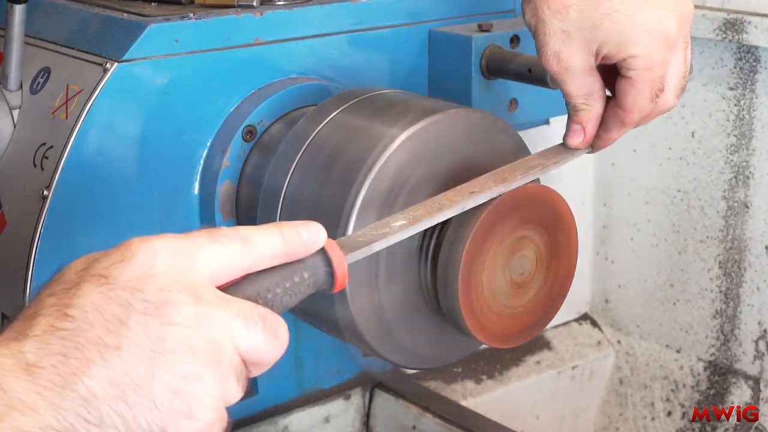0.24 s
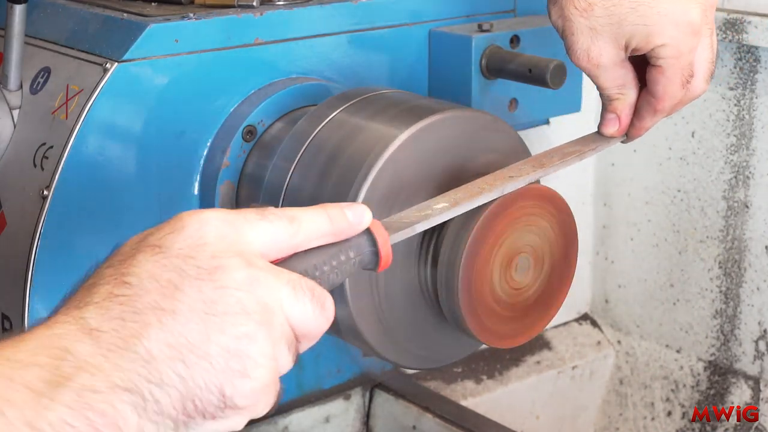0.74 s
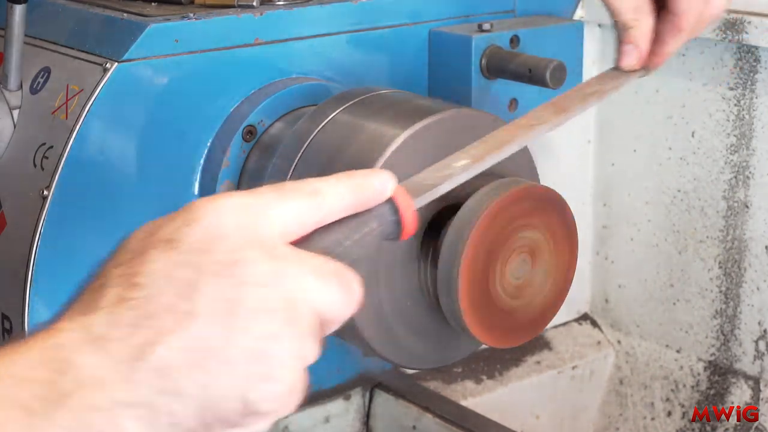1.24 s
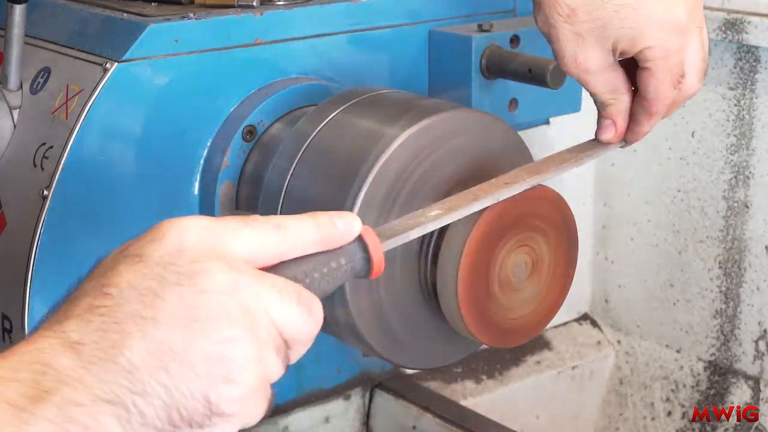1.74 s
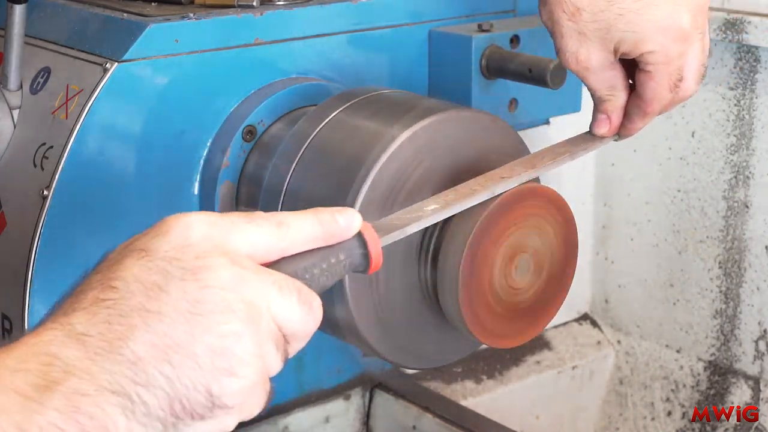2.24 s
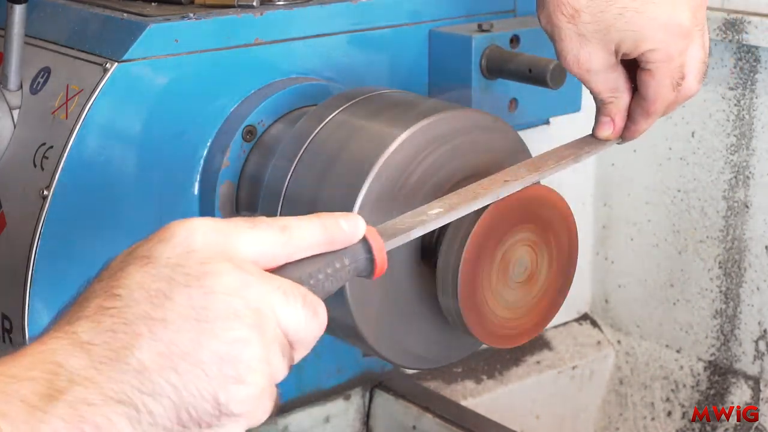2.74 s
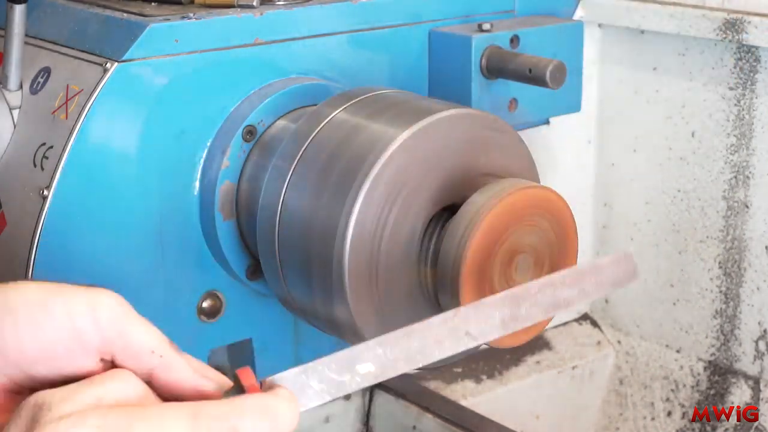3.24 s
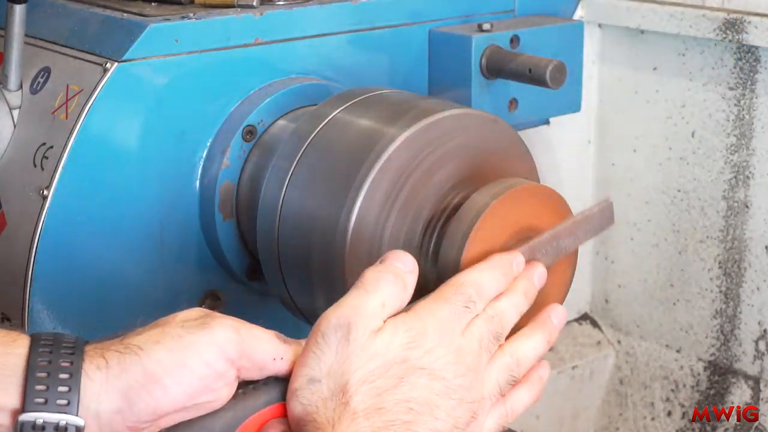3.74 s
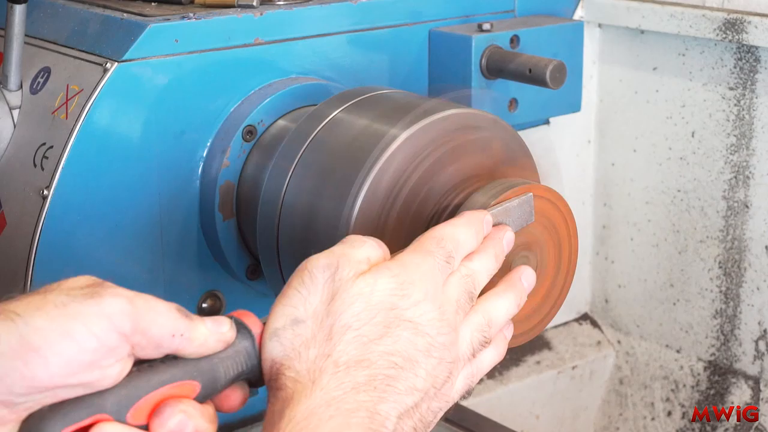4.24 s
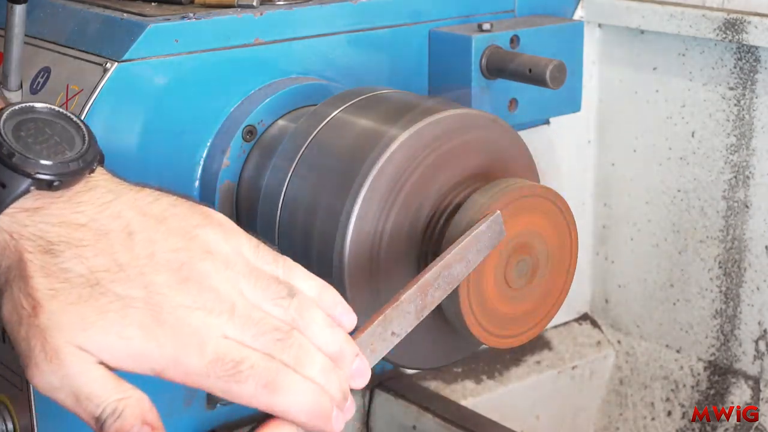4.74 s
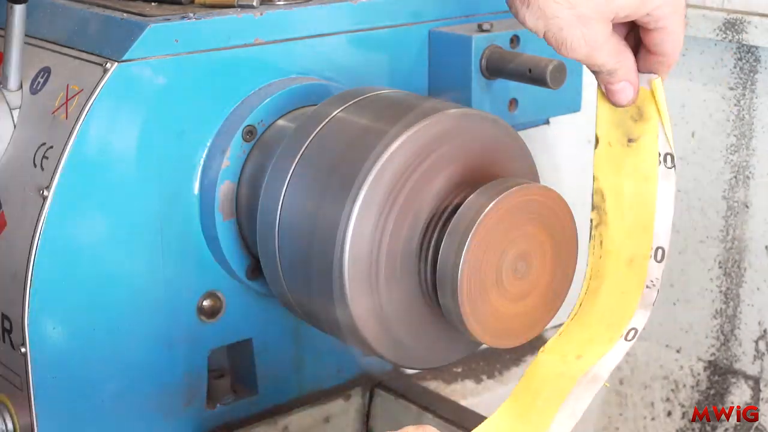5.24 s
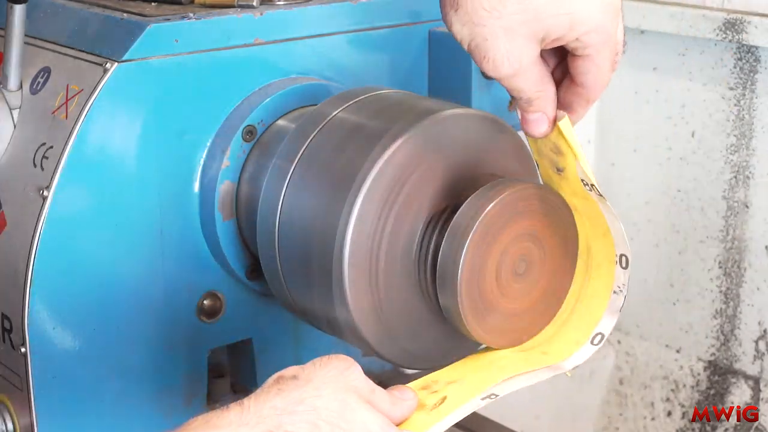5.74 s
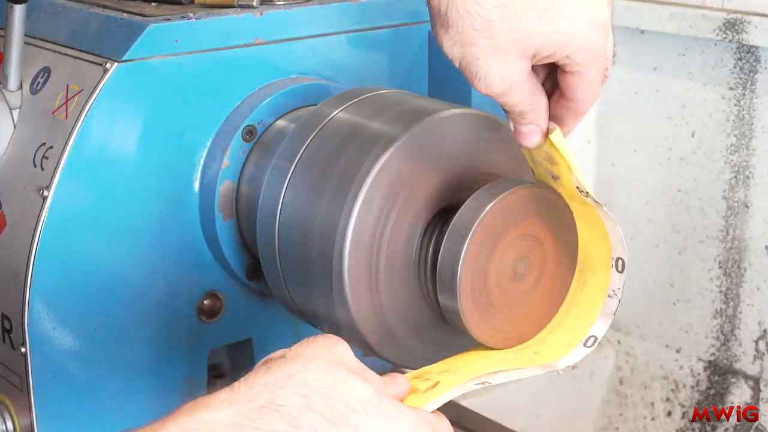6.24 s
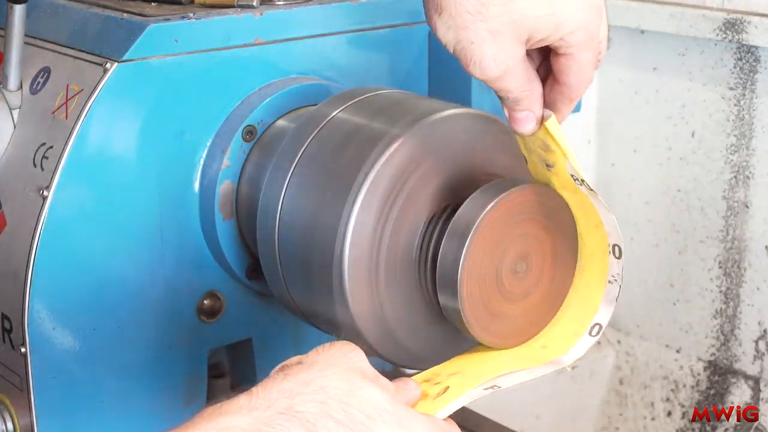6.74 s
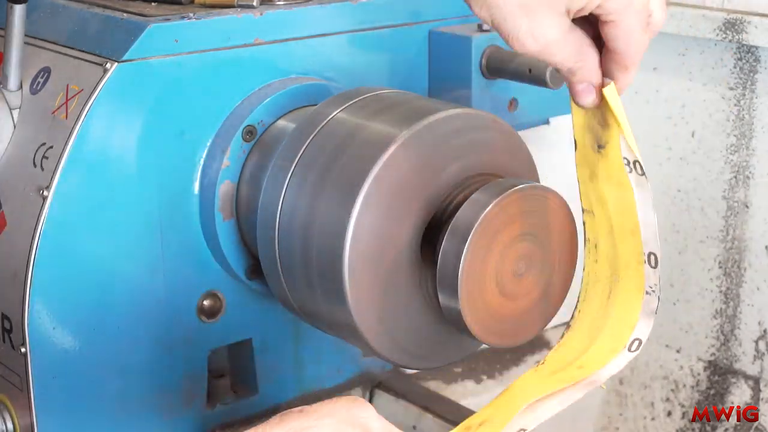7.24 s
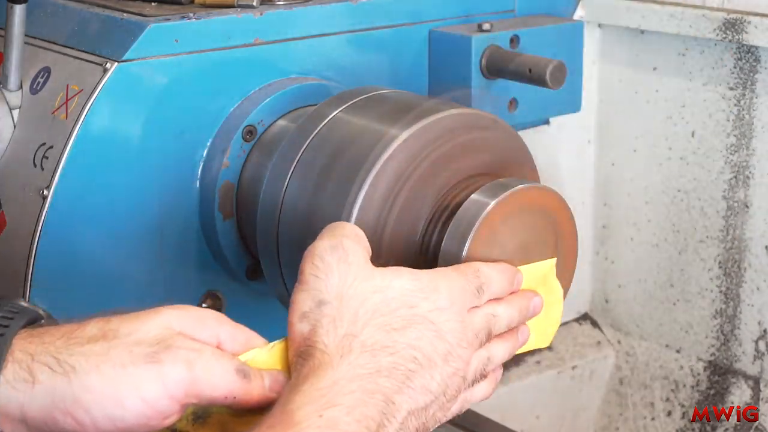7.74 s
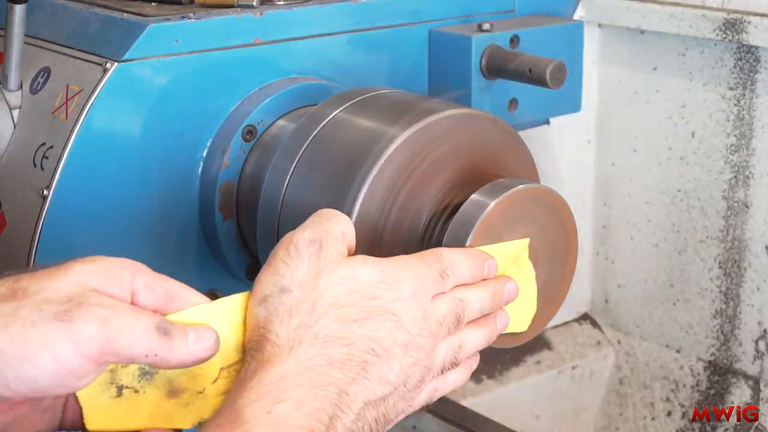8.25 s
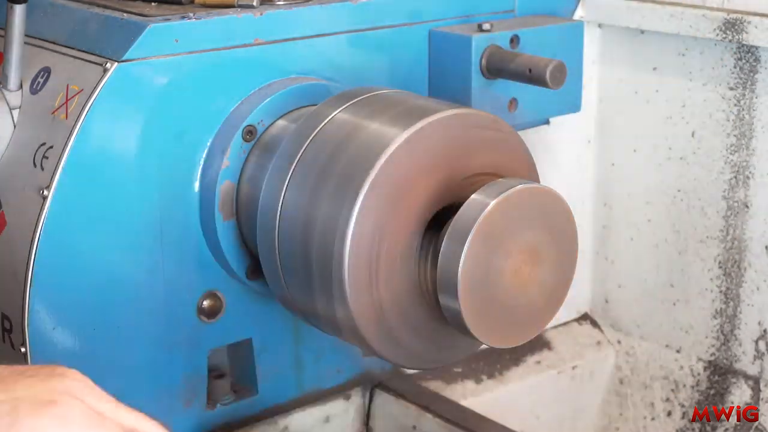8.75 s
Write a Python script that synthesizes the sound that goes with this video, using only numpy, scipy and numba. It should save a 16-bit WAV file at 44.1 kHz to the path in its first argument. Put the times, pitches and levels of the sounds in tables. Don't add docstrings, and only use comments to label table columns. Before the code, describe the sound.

A small lathe whirs with a gear whine as a file rasps metal, then everything jumps to a sped-up, high shrill whine with hiss.

```python
import sys
import numpy as np
from scipy import signal
from scipy.fft import rfft, irfft, next_fast_len
from scipy.io import wavfile
from scipy.ndimage import uniform_filter1d
from numba import njit

SR = 44100
rng = np.random.default_rng(int(sys.argv[2]) if len(sys.argv) > 2 else 0)


def to_linear_factor(level_db):
    exponent = np.asarray(level_db, float) / 20
    return 10 ** exponent


def generate_wav(sig):
    pcm = np.round(np.clip(np.atleast_2d(sig).T, -1, 1) * 32767).astype(np.int16)
    wavfile.write(sys.argv[1], SR, pcm)


N = 396900

CUT_S, HASTE = 1.5075, 6
CLEAR_DB = -60


def on_log(hz, table):
    f, v = np.transpose(table)
    return np.interp(np.log(hz + 1), np.log(f), v)


def unit(x):
    return x / np.sqrt(np.mean(x ** 2))


def walk(n, rate):
    knots = rng.standard_normal(int(n * rate / SR) + 3)
    return 0.79 * np.interp(np.arange(n) * rate / SR, np.arange(len(knots)), knots)


def steps(t, rows, ease_s):
    s, *columns = np.transpose(rows)
    row = np.clip(np.searchsorted(s, t, "right") - 1, 0, None)
    held = np.array(columns)[:, row]
    return uniform_filter1d(held, int(ease_s * SR), axis=1, mode="nearest")


def gate_db(t, s, end, rise_s, fall_s, depth_db=25):
    return depth_db * np.clip(np.minimum((t - s) / rise_s, (end - t) / fall_s), -4, 0)


@njit
def sweep(x, hz, width):
    y, b, l = np.empty(len(x)), 0., 0.
    for i in range(len(x)):
        g, k = np.tan(np.pi * hz[i] / SR), width / hz[i]
        v = (b + g * (x[i] - l)) / (1 + g * (g + k))
        b, l, y[i] = 2 * v - b, l + 2 * g * v, k * v
    return y


def bumps():
    # start_s, peak_db, pitch_hz, t60_s
    bump_events = [(5.204, -73, 300, .04), (5.205, -72, 130, 0.036), (7.164, -83, 205, .25),
                   (7.272, -66, 200, 0.14), (7.274, -79, 335, .1), (7.31, -78, 240, .2),
                   (7.349, -86, 60, .05), (8.0, -91, 240, 2.5), (8.299, -91, 135, .2), (8.67, -87, 200, .2),
                   (8.815, -83, 200, .2), (8.949, -86, 210, .2)]
    out, t = np.zeros(N), np.arange(SR // 2) / SR
    for s, db, hz, t60 in bump_events:
        ring = np.sin(2 * np.pi * np.cumsum(hz * (1 + 0.12 * walk(len(t), 40.0))) / SR)
        onset = np.sin(np.pi / 2 * np.minimum(t / .007, 1)) ** 2
        thud = ring * to_linear_factor(db - 60 * t / t60) * onset
        i = int(s * SR)
        out[i:i + len(t)] += thud[:N - i]
    return out


def file_tip(t):
    tip_s, tip_end_s, ease_s, tip_db = 4.6, 5.02, .06, -61
    rings = sum(sweep(rng.standard_normal(len(t)), hz + 0 * t, 280.) for hz in (14650., 15250.))
    contact_db = gate_db(t, tip_s, tip_end_s, ease_s, ease_s)
    return unit(rings) * to_linear_factor(tip_db + contact_db + 2.3 * walk(len(t), 40.0))


def file_stroke(t, scatter_db=2.5, throb_db=4.5, alike=.5):
    # centre_hz, width_hz
    file_modes = [(10900, 12000), (9470, 1100), (10560, 600), (13750, 450)]
    # loudest_db, fall_to_node_db, loudest_place (0-1), node_spacing (0-1), growth_db
    node_rows = [(-66.5, 5, 0.5, 1.5, -2), (-61, 6, 0.47, .47, -3), (-60.5, 24, 0.99, 0.81, 5),
                 (-71, 12, .62, 1.1, 0)]
    blade_node = (-59.5, 8, 0.7, 1.4, 3)
    ring_bend = [0, -.03, -.02, .03]
    stroke_s, stroke_end_s, bite_s, lift_s = 0.332, 1.122, .012, .045
    blade_hz, blade_arch_hz, arch_place = 7350, 650, .66
    settle_db, settle_place = -11, 0.27

    place = np.clip((t - stroke_s) / (stroke_end_s - stroke_s), 0, 1)
    contact_db = gate_db(t, stroke_s, stroke_end_s, bite_s, lift_s)
    levels = []
    for db, fall, best, gap, growth in [blade_node, *node_rows]:
        node_loss = fall * np.sin(np.pi * (place - best) / gap) ** 2
        levels.append(contact_db + db - node_loss + growth * (place - best))
    levels[2] = levels[2] + settle_db * np.clip(1 - (place / settle_place) ** 2, 0, 1)

    teeth = to_linear_factor(scatter_db * rng.exponential(1, len(t)))
    ticks = teeth * rng.standard_normal((3, len(t)))
    ticks = np.sqrt(alike) * ticks[0] + np.sqrt(1 - alike) * ticks[1:]

    arch = np.interp(place, [0, arch_place, 1], [0, 1, 0])
    low_hz = blade_hz + blade_arch_hz * arch
    out = unit(np.array([sweep(v, low_hz, 1700.0) for v in ticks])) * to_linear_factor(levels[0])
    for (hz, width), db, bend in zip(file_modes, levels[1:], ring_bend):
        drift = hz * (1 + bend * (arch - .5) + .006 * walk(len(t), 8.0))
        ring = np.array([sweep(sweep(v, drift, 1.8 * width), drift, 1.8 * width) for v in ticks])
        out = out + unit(ring) * to_linear_factor(db + throb_db * walk(len(t), 45.5))
    return out * to_linear_factor(np.array([[0.], [2.5]]))


def roar(n, haste, colour, swell_db=-0.33, flicker_db=0.2, top_db=0, tilt_db=3.0, diffuse_db=-1.0):
    # centre_hz, width_hz, level_db over the roar
    housing = [(98.5, 14, -10), (117.6, 12, 2), (300, 5.8, 5.5), (340, 14, 1), (384, 20, 5),
               (446.3, 11.8, 9.5), (503, 10, 0.5), (660, 12, 2), (780, 50, 1.5), (925, 17, 5.5),
               (1008, 17, 3.5), (1121, 53, 5), (1555, 90, 5), (1766, 36, 2.5), (2190, 24, 5.5),
               (2344, 37, 4.5)]
    side_table = {1: [(60, -15), (110, -27), (200, -44), (380, -14), (700, -5), (1290, -4), (2380, -4.5),
                  (4400, -0.5), (8120, -2), (15000, -1)], HASTE: [(60, -4), (110, -12), (200, -10),
                  (380, -24), (700, -27), (1290, -24), (2380, -17), (4400, -5.5), (8120, -5.5),
                  (15000, -4)]}
    lean_table = {1: [(60, .5), (110, .5), (200, -2), (380, -3), (700, -2.5), (1290, -1.5), (2380, -4),
                  (4400, -1.5), (8120, -3.5), (15000, 0)], HASTE: [(60, 0.0), (110, -1), (200, -0.5),
                  (380, 1), (700, 1), (1290, -0.5), (2380, -2.5), (4400, -3), (8120, -1.5), (15000, -4.5)]}
    size = next_fast_len(n)
    hz = np.arange(size // 2 + 1) * SR / size
    resonance = 1
    for f, w, db in housing:
        resonance = resonance + (to_linear_factor(db) ** 2 - 1) / (1 + (2 * (hz / haste - f) / w) ** 2) ** 2
    gain = to_linear_factor(on_log(hz, colour)) * np.sqrt(resonance)

    mid, side = rfft(rng.standard_normal((2, size)))
    side_db = on_log(hz, side_table[haste])
    side = side * to_linear_factor(side_db + diffuse_db)
    notch, tilt = (walk(len(hz), SR * SR / size / haste / 4) for _ in range(2))
    gain = gain * to_linear_factor(np.clip(1500 * haste / (hz + 1), 2, 4) * notch)
    lean = to_linear_factor(on_log(hz, lean_table[haste]) / 2 + tilt_db * to_linear_factor(side_db) * tilt)
    pair = gain * np.array([(mid + side) * lean, (mid - side) / lean])

    place, swell, out = 2 * np.log2(hz + 1), walk(n, 3.5 * haste), 0
    for k in range(8, 29):
        share = np.clip(1 - np.abs(place - k), 0, 1)
        db = swell_db * swell + flicker_db * walk(n, 12.0)
        if k == 28:
            db = db + top_db
        out = out + to_linear_factor(db) * irfft(pair * share, size)[:, :n]
    reference = gain[(hz > 1100 * haste) & (hz < 2000 * haste)]
    return out / np.sqrt(np.mean(np.abs(reference) ** 2))


def drag(t):
    # start_s, end_s, lost_rps (turns a second)
    presses = [(.33, 1.15, .06), (1.51, 1.74, .085), (1.82, 1.97, .045), (2.07, 2.42, .07),
               (2.54, 2.63, .05), (2.73, 2.95, .06), (3.08, 3.19, .07), (3.53, 3.97, .05), (4.1, 4.4, .04),
               (4.65, 5.2, .04), (5.44, 5.55, .08), (5.72, 6.02, .06), (6.2, 6.98, .06), (7.18, 7.42, .035),
               (7.57, 8.05, .045), (8.18, 8.74, .055)]
    lost = sum(rps * ((t >= s) & (t < end)) for s, end, rps in presses)
    return uniform_filter1d(lost, int(.07 * SR), mode="nearest")


def whine(shade, turns, haste, tone_db, beat_db, lag, wobble=0.28, memory=7.0):
    # order (multiple of the shaft rate), left_db, right_db
    gear_tones = [(3, -95, -95), (14, -70, -69), (15, -69, -69), (17, -72, -72), (19, -72, -72),
                  (23, -65, -66), (24, -60, -53), (27, -71, -71), (29, -74, -72), (31, -67, -64),
                  (33, -68, -73), (35, -73, -72), (36, -73, -72), (37, -64, -62), (38, -76, -72),
                  (39, -74, -72), (42, -74, -66), (43, -70, -66), (46, -70, -73), (48, -60, -55),
                  (49, -76, -78), (51, -70, -77), (57, -72, -70), (60, -77, -74), (65, -78, -76),
                  (72, -68, -69), (74, -72, -70), (93, -78, -75), (96, -75, -84)]
    # order (multiple of the shaft rate), left_db, right_db
    beat_tones = [(3.65, -90, -90), (4.2, -89, -89), (4.65, -80, -80), (6.62, -85, -85), (8.12, -81, -82),
                  (8.58, -78, -78), (9.28, -84, -84), (11.68, -81, -81), (14.45, -77, -77),
                  (15.2, -72, -72), (18.55, -75, -74), (19.45, -71, -71), (20.7, -68, -67),
                  (22.2, -73, -77), (23.736, -63, -65), (24.2, -68, -63), (24.34, -68, -66),
                  (31.2, -73, -72), (38.33, -69, -69), (39.45, -78, -77), (47.5, -69, -70),
                  (48.5, -69, -70), (69.35, -76, -73), (71.5, -72, -69), (103.45, -71, -64),
                  (105.3, -77, -69), (107.02, -77, -71), (110.28, -77, -75)]
    shake_rows = [(.2, .25, .2), (.5, .4, .25)]
    mesh_order = 24
    n, out = len(turns), 0
    rate = haste * 21.5 / memory
    shake = 0
    for order, pitch, size in shake_rows:
        shake = shake + (1j * pitch + size) * np.sin(2 * np.pi * (order * turns + rng.random()))
    for order, left_db, right_db in [*gear_tones, *beat_tones]:
        beside = abs(order - mesh_order) < .6
        steady = beside or order < 5 or abs(order - 2 * mesh_order) < .6
        sway = .08 if steady else wobble
        load = 1 + sway * (walk(n, rate) + 1j * walk(n, rate))
        tone = np.sqrt(2) * load * np.exp(2j * np.pi * (order * turns + rng.random()))
        db = np.array([[left_db], [right_db]]) + (beat_db if beside else tone_db)
        if order == mesh_order:
            db, tone = shade[:2], tone * np.exp(1j * lag * np.array([[1], [0]]))
        if order == 2 * mesh_order:
            db, tone = shade[2:], tone * np.exp(shake)
        out = out + to_linear_factor(db) * tone.real
    return out


def lathe(t, haste, colour, roar_db, tone_db, beat_db, lag, right_db):
    # start_s, mesh_db, octave_db
    postures = [(0, -66, -51.5), (1.5075, -69, -52), (1.8, -64, -55), (2.3, -60.5, -58), (3.05, -64, -62.5),
                (3.5, -73, -63), (4.1, -71, -69), (4.42, -60, -63), (5.3, -57.5, -61.5), (7.35, -63, -57.5),
                (8.1, -63, -60.5)]
    cold_rps, warm_rps, creep_rps, warming_s = 21.415, 21.62, .16, 3.0
    right_shade, roar_shade = .25, 0.034
    rub_db_per_rps = 29.5
    free = cold_rps if haste == 1 else warm_rps - creep_rps * np.exp((CUT_S - t) / warming_s)
    lost = drag(t)
    turns = np.cumsum(haste * (free - lost)) / SR
    mesh, octave = steps(t, postures, .2)
    right = np.reshape(right_db, (2, 1)) + right_shade * (np.array([mesh, octave]) - CLEAR_DB)
    shade = np.array([mesh, right[0], octave, right[1]])
    top_db = rub_db_per_rps * (lost - np.mean(lost)) * (haste > 1)
    rumble = roar(len(t), haste, colour, top_db=top_db) * to_linear_factor(roar_db + roar_shade * (mesh - CLEAR_DB))
    return rumble + whine(shade, turns, haste, tone_db, beat_db, lag)


def treble_dropout(x, faint_db=-105.5, ragged_db=5.0):
    _, _, z = signal.stft(x, SR, nperseg=2048)
    bands = z[:, :1024].reshape(2, 64, 16, -1)
    level = np.sqrt(np.mean(np.abs(bands) ** 2, axis=(0, 2)))
    keep = level > to_linear_factor(faint_db + ragged_db * rng.standard_normal(level.shape))
    z[:, :1024] = (bands * keep[None, :, None]).reshape(2, 1024, -1)
    return signal.istft(z, SR, nperseg=2048)[1][:, :x.shape[1]]


def scene():
    # freq_hz, density_db (per Hz)
    slow_roar = [(20, -48), (60, -28), (150, -20), (270, -12.5), (400, -9), (850, -10), (2370, -11.5),
                 (3850, -16), (4640, -22), (6950, -27.5), (10000, -36.5), (13000, -43.5), (14800, -47),
                 (15800, -58)]
    # freq_hz, density_db (per Hz)
    fast_roar = [(35, -81), (60, -45), (352, -42), (588, -18), (646, -26.5), (1080, -15), (1390, -17.5),
                 (2610, -6.5), (2800, -12.5), (3070, -5.5), (3370, -10.5), (6040, -8.5), (8180, -10),
                 (13700, -11), (15700, -10)]
    t = np.arange(N) / SR
    slow, fast = t[t < CUT_S], t[t >= CUT_S]
    first = lathe(slow, 1, slow_roar, roar_db=-39.0, tone_db=-0.3, beat_db=4.0, lag=3.1,
                  right_db=(-57.5, -53))
    first = treble_dropout(first + file_stroke(slow))
    second = lathe(fast, HASTE, fast_roar, roar_db=-47.0, tone_db=0.0, beat_db=1.1, lag=0,
                   right_db=(-52.8, -54.6))
    return np.hstack([first, second + file_tip(fast)]) + bumps()


def band_limit(x):
    return signal.sosfilt(signal.butter(12, 16130, fs=SR, output="sos"), x)


def record(dry):
    size = next_fast_len(N)
    below = np.arange(size // 2 + 1) * SR / size < 15715
    mix = irfft(rfft(dry, size) * below, size)[:, :N]
    return band_limit(mix)


dry = scene()
out = record(dry)
generate_wav(out)
```